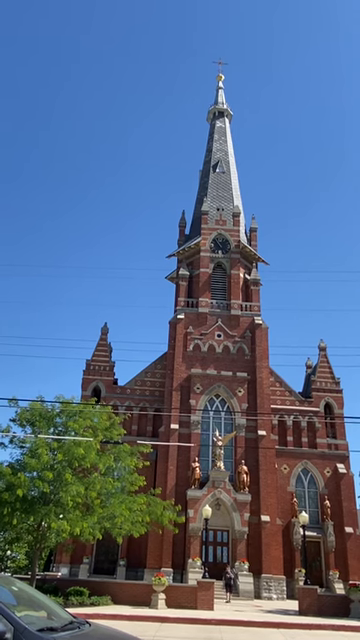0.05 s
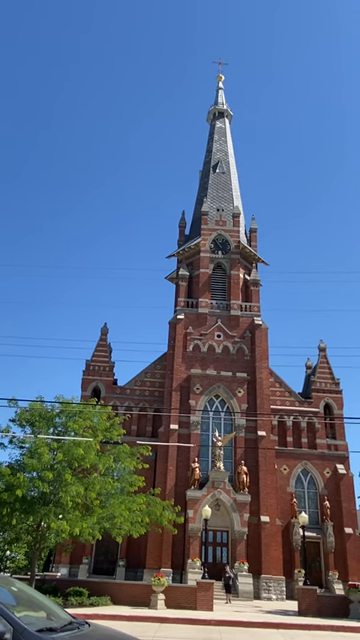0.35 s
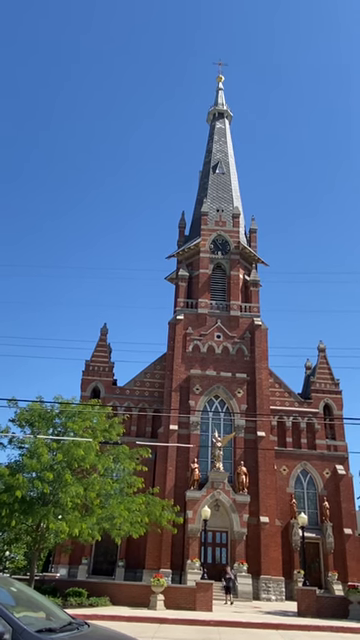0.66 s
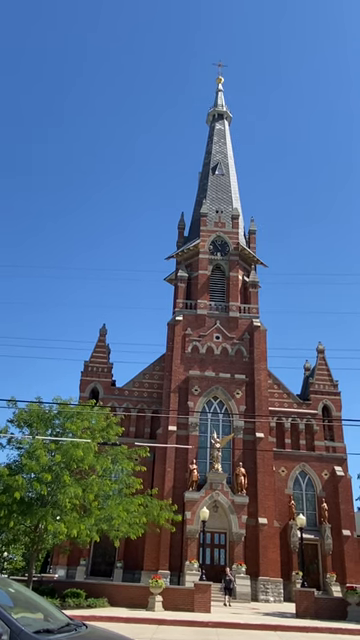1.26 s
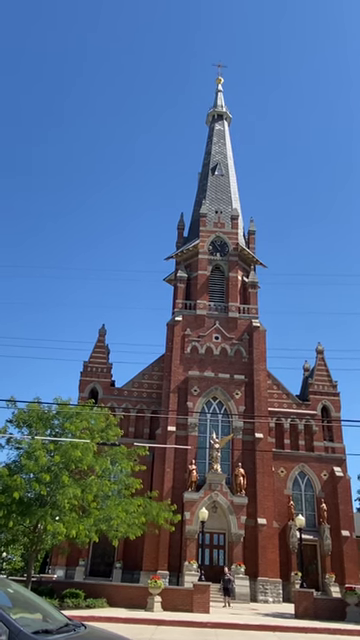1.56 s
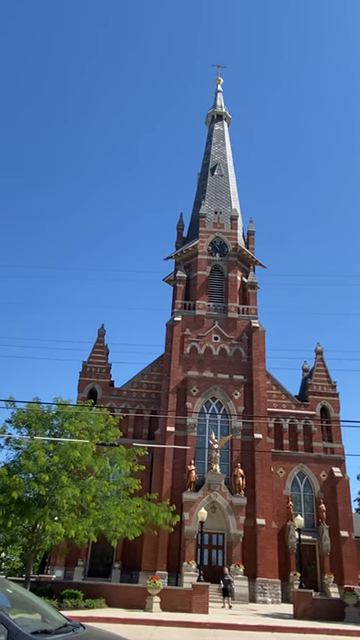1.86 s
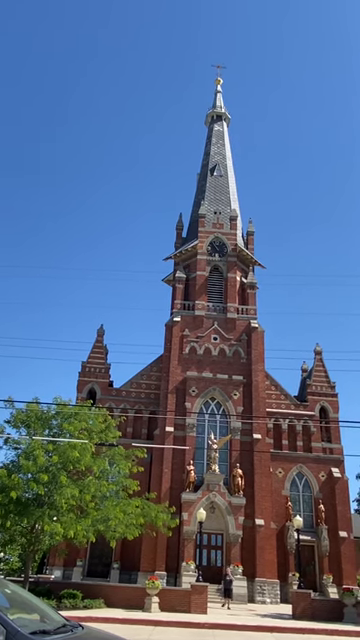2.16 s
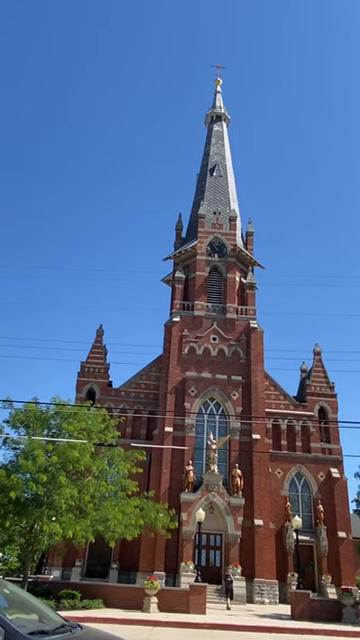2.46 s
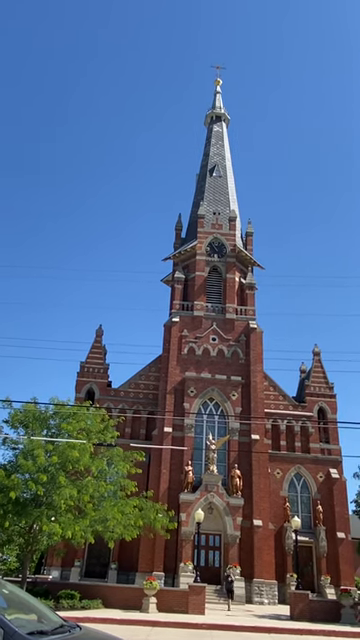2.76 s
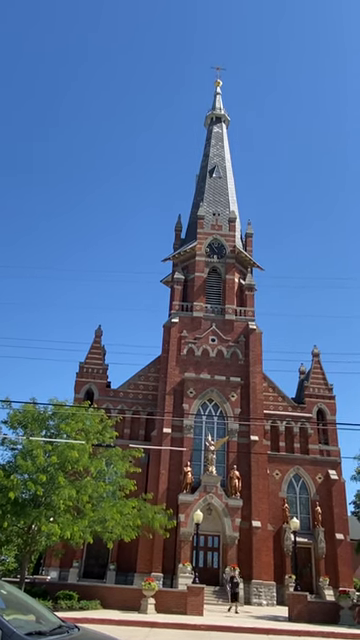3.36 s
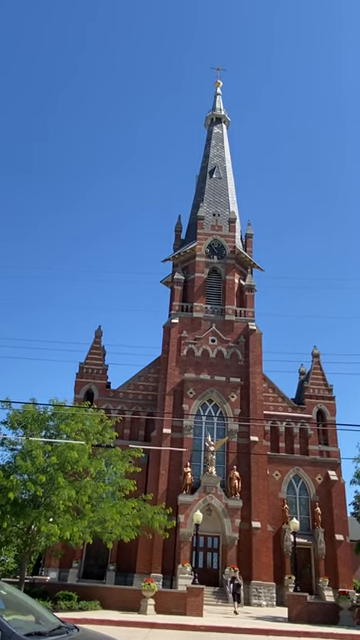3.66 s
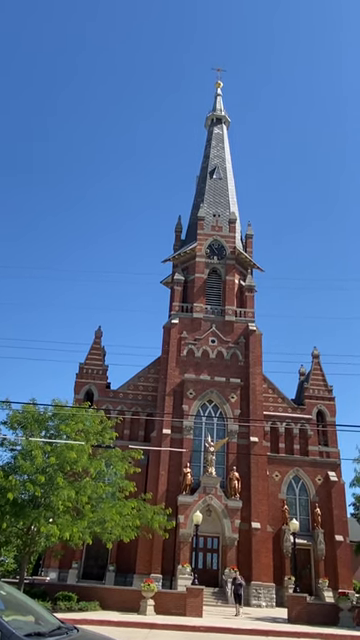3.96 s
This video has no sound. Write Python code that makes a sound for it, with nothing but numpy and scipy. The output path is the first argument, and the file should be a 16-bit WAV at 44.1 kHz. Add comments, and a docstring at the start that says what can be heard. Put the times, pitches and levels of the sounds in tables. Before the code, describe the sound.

One clanging church bell stroke fades slowly over chirping sparrows and a low rumble.

```python
"""Across the street a church bell in a brick tower still hums from its last stroke, over light wind
and the low rumble of distant engines. A sparrow starts chirping between the house fronts.
Just before half a second the striking gear squeals; then the blow clangs in the belfry.
The bell's paired modes beat slowly as they die away, the high ones mostly first,
while the chirps go on and two faint ticks sound close by."""
import sys
import numpy as np
from scipy import signal
from scipy.fft import rfft, irfft
from scipy.io import wavfile

SR = 44100
rng = np.random.default_rng(int(sys.argv[2]) if len(sys.argv) > 2 else 0)


def transcribe(u):
    """Save the signal u as a 16-bit wav file named by the first command-line argument.

    u: samples, shape (n,) or (channels, n), limited to [-1, 1]; the rate is SR.
    q: integer samples, one column per channel.
    """
    v = np.clip(np.atleast_2d(u).T, -1, 1)
    q = np.round(v * 32767).astype(np.int16)
    wavfile.write(sys.argv[1], SR, q)


N = 176400
T = np.arange(N) / SR


def from_db(db):
    """Amplitude ratio: tenfold for every 20 dB."""
    return 10 ** (np.asarray(db) / 20)


def at_hz(points, hz):
    """Interpolation of a spectrum on a log-frequency axis."""
    freqs, values = np.transpose(points)
    return np.interp(np.log(np.maximum(hz, 1)), np.log(freqs), values)


def fade(age, t60):
    """Exponential damping from age zero: 60 dB in t60 seconds."""
    return np.exp(-np.log(1000) * np.maximum(age, 0) / t60)


def panned(pan_db):
    """Interaural level difference as left and right gains."""
    return from_db(np.array([[.5], [-.5]]) * pan_db)


def drift(rate_hz):
    """Random modulation, mostly below rate_hz, with a spread of about one."""
    knots = rng.standard_normal(4096)
    return np.interp(T * rate_hz * 2, np.arange(len(knots)), knots)


def tone(hz, envelope):
    """Interaural phase difference: a modulated sine leads at the right ear, more so up to 700 Hz."""
    apart_rad = 0.75 * min(hz / 700, 1) ** 2
    wave = envelope * np.exp(2j * np.pi * (hz * T + rng.random()))
    return (wave * np.exp(1j * apart_rad * np.array([[-.5], [.5]]))).real


# Likeness of the two ears: frequency_hz, coherence_ratio
COHERENCE = [(25, 1), (70, 1), (250, 0.98), (600, 0.2), (1500, 0.4), (4000, 0), (10000, 0.1)]

def noise(spectrum):
    """Partly coherent noise of a given density: alike at both ears in the bass, diffuse in the treble."""
    hz = np.arange(N // 2 + 1) * SR / N
    mid, side = rfft(rng.standard_normal((2, N))) * from_db(at_hz(spectrum, hz)) * np.sqrt(SR / 2)
    alike = np.clip(at_hz(COHERENCE, hz), 0, 1)
    return irfft(mid * np.sqrt((1 + alike) / 2) + side * np.sqrt((1 - alike) / 2) * [[1], [-1]], N)


def echoes(sound, t60):
    """Reverberation: convolution with dense decaying reflections, different at each ear."""
    tail = rng.standard_normal((2, SR)) * fade(T[:SR], t60)
    tail /= np.sqrt(np.sum(tail ** 2, axis=1, keepdims=True))
    return signal.fftconvolve(sound, tail, axes=1)[:, :N]


# Rumble before its swell: frequency_hz, density_db_per_hz
RUMBLE_SPECTRUM = [(15, -102), (25, -86.5), (40, -77), (60, -70), (85, -68), (120, -71.5), (165, -76),
                   (210, -83), (400, -88.5), (900, -87), (1600, -96), (2500, -102), (4000, -106),
                   (5200, -111), (7200, -133), (10000, -131), (12500, -136)]
# Its swell: time_s, gain_db
RUMBLE_SWELL = [(0, 2.5), (2.5, 2.5), (3.3, 1.5), (3.7, 1.5), (4, 3)]

def wind_and_traffic():
    """Broadband noise of light wind and far traffic, strongest in the bass."""
    return noise(RUMBLE_SPECTRUM) * from_db(np.interp(T, *np.transpose(RUMBLE_SWELL)))


# A distant engine's loudness: time_s, level_db
DRONE_LEVELS = [(0, -51), (.75, -43), (1.3, -43.5), (1.5, -52.5), (1.76, -35), (2.05, -52.5), (2.4, -57),
                (2.9, -47.5), (4, -51)]

def drone_and_hum(drone_hz=68, hum_hz=147.6, hum_db=-48):
    """Amplitude and phase modulation: an engine's drone swells and wavers under a nearly steady hum."""
    swell = from_db(np.interp(T, *np.transpose(DRONE_LEVELS)))
    drone = tone(drone_hz, swell * (1 + 0.18 * (drift(3.3) + 1j * drift(3.2))))
    return drone + tone(hum_hz, from_db(hum_db) * (1 + 0.097 * drift(1)))


EARLIER_STROKE_S, STROKE_S, BUILD_UP_S = -2.605, .491, 0.023
# Main modes, each with a detuned twin:
# pitch_hz, level_db, t60_s, twin_offset_hz, twin_amplitude_ratio, beat_dip_age_s, pan_left_db
BELL_DOUBLETS = [ (256.4, -39.3, 55, -1.2, .02, .3, 0), (321.1, -39, 25, .2, .89, 1.78, 2),
                 (432.7, -44, 8.9, -.5, .24, .08, 2), (531.5, -33, 6.8, .91, .5, -.03, 3),
                 (693, -36, 3.3, -3.1, .06, .03, 7), (718.5, -35, 2.5, 2.66, .75, .04, 0),
                 (740.9, -43, 4.9, -1.6, .12, .34, 3), (792.3, -33.5, 6, -.63, .75, .01, -1),
                 (896.7, -38.5, 2.8, 1.0, .2, .6, 2), (1088.3, -33, 6, .5, .15, -.2, -2),
                 (1259.4, -39, 1.9, -2.6, .22, .16, 1), (1414.5, -30.3, 4.4, 1.2, .17, -.07, -3),
                 (1762, -44, 3.2, -12.5, .55, .02, 1), (2126.3, -32.5, 3.3, 5.5, .33, .05, 3),
                 (2304.8, -40, 1.9, -17.5, .6, .02, 2), (2497.4, -36.5, 3.2, .7, .25, .6, -3),
                 (2793.4, -34.5, 2.5, 1.1, .1, .4, 6)]
# Weaker single modes: pitch_hz, level_db, t60_s, pan_left_db
BELL_SINGLETS = [ (1210, -48, 2, 0), (1371.1, -47, 4.5, -1), (1615, -44, 2, 0), (1723, -42, 2.6, 0),
                 (1750, -47, 2.8, 0), (1975, -40.5, 2.5, 4), (2155, -45, 1.5, 0), (2607.5, -42.5, 3.9, 1),
                 (2666.1, -46, 2.3, -7), (2690, -47, 1.5, 0), (2742.8, -42, 2.5, -6), (2885.6, -43, 2, 0),
                 (3110, -49, 2, -1), (3149.2, -47, 2.6, -12), (3387.3, -47, 2, -1), (3502.3, -50, 3, 2),
                 (3559.2, -53, 2.7, -4), (3735, -55, 1.8, 0), (3972, -57, 3, -6), (4015, -51, 1.8, 0),
                 (4106.8, -49, 1.6, -6), (4511.9, -56, 2.1, -2), (4574.5, -54, 1.9, 3), (4750, -57, 1.6, 0),
                 (5002.8, -54, 1.7, 8), (5350, -61, 1.5, 0), (5683, -60, 1.5, 0)]

def bell(waver_depth=0.052, waver_hz=7):
    """Beating: twin modes interfere and waver in moving air; the new stroke replaces the old ring."""
    struck = np.clip((T - STROKE_S) / BUILD_UP_S, 0, 1)
    age, old_age = T - STROKE_S - BUILD_UP_S / 2, T - EARLIER_STROKE_S
    out = np.zeros((2, N))
    for hz, db, t60, offset_hz, twin, dip_s, pan in BELL_DOUBLETS:
        new, old = (fade(since, t60) * (1 - twin * np.exp(2j * np.pi * offset_hz * (since - dip_s)))
                    for since in (age, old_age))
        ring = struck * new + (1 - struck) * old
        waver = 1 + waver_depth * min(hz / 700, 2) * drift(waver_hz)  # deeper with pitch
        out += from_db(db) * panned(pan) * tone(hz, ring * waver)
    for hz, db, t60, pan in BELL_SINGLETS:
        waver = 1 + 2 * waver_depth * drift(waver_hz)
        out += from_db(db) * panned(pan) * tone(hz, struck * fade(age, t60) * waver)
    return out


# Course of one chirp: length_fraction, pitch_ratio, amplitude_ratio
CHIRP_CONTOUR = [(0, .84, 0), (.07, .96, .8), (.14, .98, 1), (.22, .8, .8), (.35, .76, .9), (.46, .74, .15),
                 (.62, .76, .75), (.78, .7, .7), (.9, .62, .5), (1, .6, 0)]

def chirps(rows, rasp_hz=205):
    """Frequency modulation: each two-part whistle falls in pitch, and fast jitter makes it rasp."""
    fraction, pitch, amplitude = np.transpose(CHIRP_CONTOUR)
    out, rasp = np.zeros((2, N)), rasp_hz * drift(400)
    for start, db, top_hz, length, fall, second_db, pan in rows:
        on = (T >= start) & (T < start + length)
        along = (T[on] - start) / length
        hz = top_hz * np.interp(along, fraction, pitch) ** fall + rasp[on]
        second_part = np.clip((along - .4) * 10, 0, 1)
        gain = from_db(db + second_db * second_part) * np.interp(along, fraction, amplitude)
        out[:, on] += panned(pan) * gain * np.sin(2 * np.pi * np.cumsum(hz) / SR)
    return out


# The near sparrow's calls:
# start_s, level_db, top_pitch_hz, length_s, fall_exponent, second_part_gain_db, pan_left_db
NEAR_CHIRPS = [(0.085, -53.5, 4550, 0.11, 0.78, -1.5, 1), (0.321, -52.5, 4790, 0.13, 1, 1, 1.5),
               (1.04, -58, 4786, 0.19, 0.98, -0.5, 2), (1.343, -52, 4860, .11, 1, 3, 1.5),
               (1.597, -62, 4790, 0.1, 0.98, 3, 1), (2.05, -56.5, 4460, 0.12, .75, 5.5, 2),
               (2.67, -50.5, 4750, .118, 1, 1.5, 1), (2.916, -55, 4674, .11, .85, 3, 1.5),
               (3.862, -50, 4730, 0.12, 0.96, 0.5, 2)]

def sparrows(far_per_s=3.3, far_db=-66, far_top_hz=4630, far_length_s=0.078):
    """Reflection: a wall and the street echo one near sparrow; far ones are heard by echo alone."""
    near = chirps(NEAR_CHIRPS)
    far = chirps([
        ((k + when) / far_per_s, far_db + 3 * size, far_top_hz * (1 + .12 * pitch),
         far_length_s, 1, 0, 4 * pan)
        for k, (when, size, pitch, pan) in enumerate(rng.uniform(-1, 1, size=(30, 4)))])
    wall = from_db(1) * echoes(near + far, t60=0.085)
    street = from_db(-1) * echoes(near + far, t60=0.8)
    return near + wall + street


# Partials of the gear's squeal: pitch_hz, level_db
SQUEAL_PARTIALS = [(960, -46.5), (1712, -40.5), (2028, -37.5), (2160, -36), (2331, -31), (2686, -53.5),
                   (5432, -59)]
# Its rubbing noise: frequency_hz, density_db_per_hz
RUB_SPECTRUM = [(200, -100), (500, -69), (1000, -75.5), (1700, -70), (2400, -81.5), (3100, -85.5),
                (4300, -91.5), (5400, -82), (7500, -108), (10000, -101), (12500, -107)]

def striking_gear(start_s=0.4283, attack_s=0.023, release_s=0.51, roughness=0.8):
    """Friction: metal rubs and squeals, starting just before the blow lands."""
    envelope = np.clip((T - start_s) / attack_s, 0, 1) * fade(T - release_s, t60=0.66)
    squeal = sum(from_db(db) * tone(hz, 1 + roughness * (drift(40) + 1j * drift(31)))
                 for hz, db in SQUEAL_PARTIALS)
    return envelope * (squeal + noise(RUB_SPECTRUM))


# The blow in the belfry: frequency_hz, density_db_per_hz
CLANG_SPECTRUM = [(150, -90), (250, -57.5), (350, -61.5), (550, -54.5), (800, -53), (1200, -71.5),
                  (1700, -65), (2700, -62.5), (3400, -73.5), (5000, -84), (6500, -100), (8000, -106),
                  (10000, -101), (12500, -108)]
# Its quieter, longer echo in the street: frequency_hz, density_db_per_hz
CLANG_ECHO_SPECTRUM = [(150, -100), (280, -68), (600, -75), (1100, -78.5), (1700, -77), (2700, -80.5),
                       (3500, -87.5), (5000, -87.5), (7000, -108), (10000, -114), (12500, -124)]

def clang(peak_s=0.539, rise_s=0.034):
    """Impact: a broadband crash swells and dies in the belfry, reverberating longer in the street."""
    age = T - peak_s
    rise = np.exp(np.minimum(age, 0) / rise_s)
    belfry = noise(CLANG_SPECTRUM) * fade(age, t60=0.33)
    street = noise(CLANG_ECHO_SPECTRUM) * fade(age, t60=0.54)
    return rise * (belfry + street)


# The bell's crowd of faint modes: pitch_hz, median_level_db
OVERTONE_LEVELS = [(500, -63.5), (1000, -55), (2000, -61.5), (3000, -64.5), (4000, -63), (5500, -66),
                   (6800, -87), (8000, -103.5), (10000, -87), (12000, -95)]

def bell_overtones(count=170, t60_at_3khz_s=1.8, damping_exponent=0.21):
    """Frequency-dependent damping: the stroke excites many faint modes, and higher ones die sooner."""
    age = T[T > STROKE_S] - STROKE_S
    low, high = np.sqrt(OVERTONE_LEVELS[0][0]), np.sqrt(OVERTONE_LEVELS[-1][0])
    out = np.zeros((2, N))
    for k, (place, size, pan, phase, apart) in enumerate(rng.uniform(-1, 1, (count, 5))):
        hz = (low + (high - low) * (k + place / 2 + .5) / count) ** 2
        t60 = t60_at_3khz_s * (3000 / hz) ** damping_exponent
        envelope = from_db(at_hz(OVERTONE_LEVELS, hz) + 15 * size) * fade(age, t60)
        angle = 2 * np.pi * ((hz * age + phase) % 1) + apart * np.array([[1], [-1]])
        out[:, -len(age):] += panned(5 * pan) * envelope * np.sin(angle.astype(np.float32))
    return out * np.clip((T - STROKE_S) / BUILD_UP_S, 0, 1)


# Faint ticks close by: start_s, level_db
TICK_EVENTS = [(1.333, -67), (3.174, -65.5)]

def ticks():
    """Transients: quickly damped bursts of white noise sound as tiny bright ticks."""
    envelope = sum(from_db(db) * (T > start) * fade(T - start, t60=0.028) for start, db in TICK_EVENTS)
    return envelope * rng.standard_normal(N)


def scene():
    """Superposition: street, birds and tower add at each ear."""
    street = wind_and_traffic() + drone_and_hum()
    return street + bell() + sparrows() + striking_gear() + clang() + bell_overtones() + ticks()


def record(dry):
    """Low-pass filtering: the treble is cut steeply above 12.4 kHz."""
    return signal.sosfilt(signal.ellip(10, .1, 80, 12400, fs=SR, output="sos"), dry)


dry = scene()
out = record(dry)
transcribe(out)
```